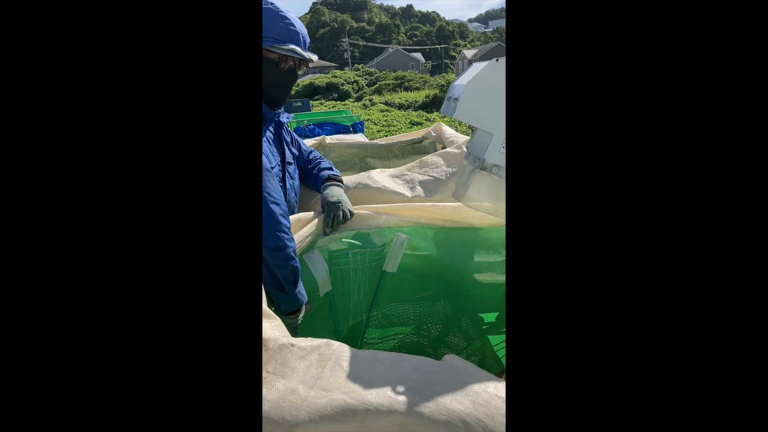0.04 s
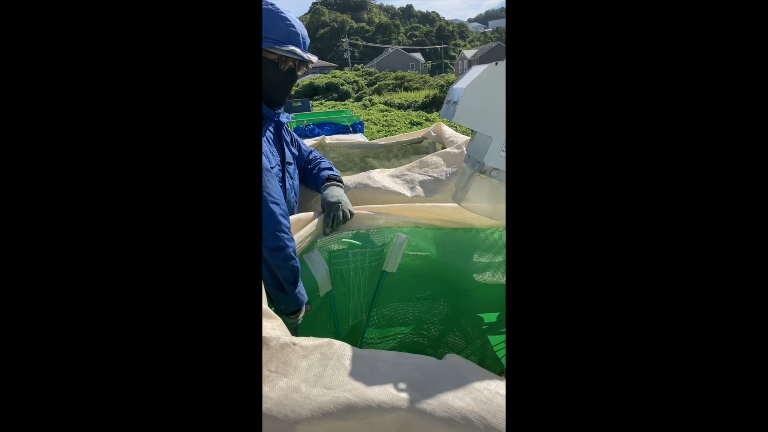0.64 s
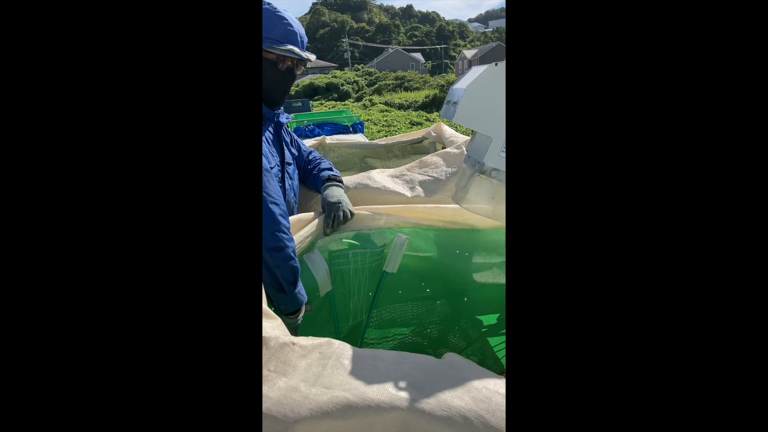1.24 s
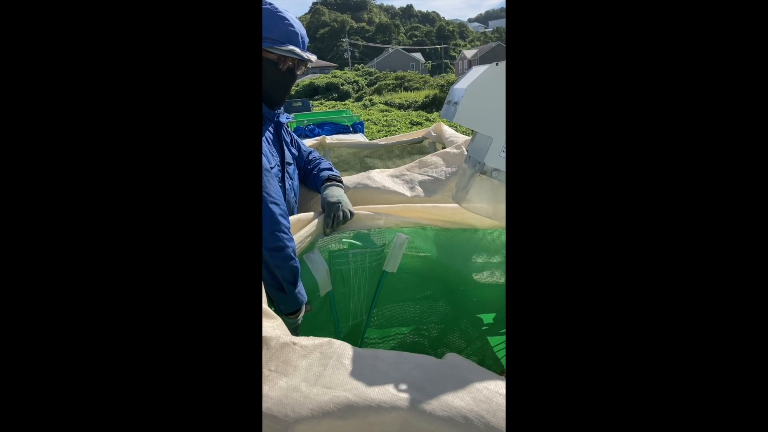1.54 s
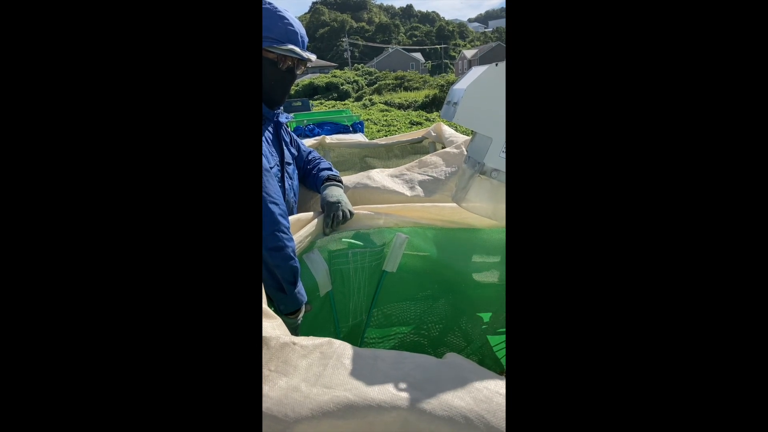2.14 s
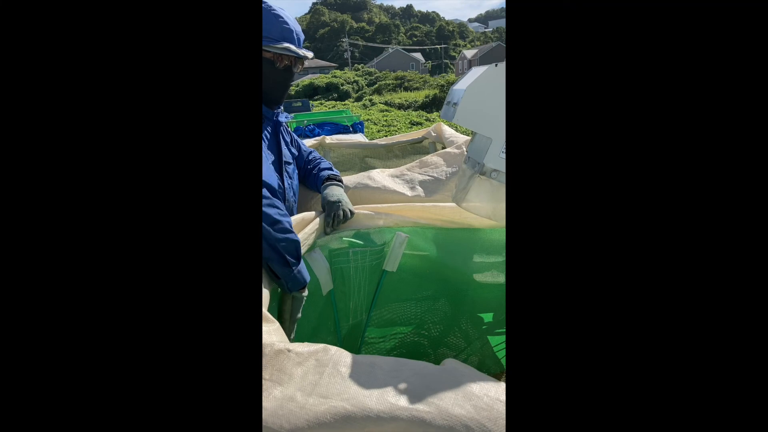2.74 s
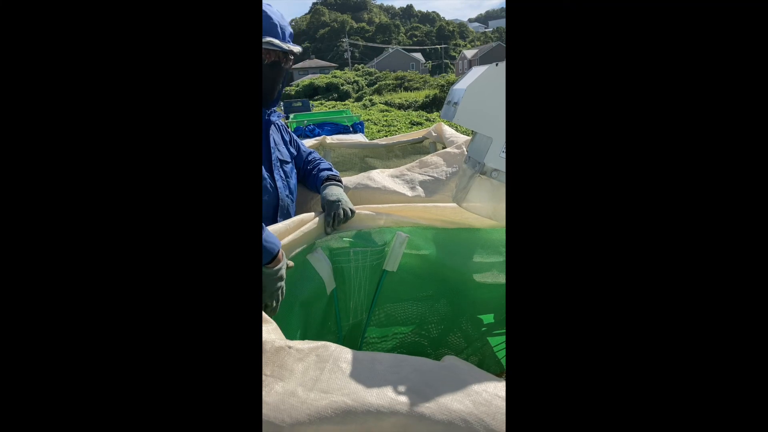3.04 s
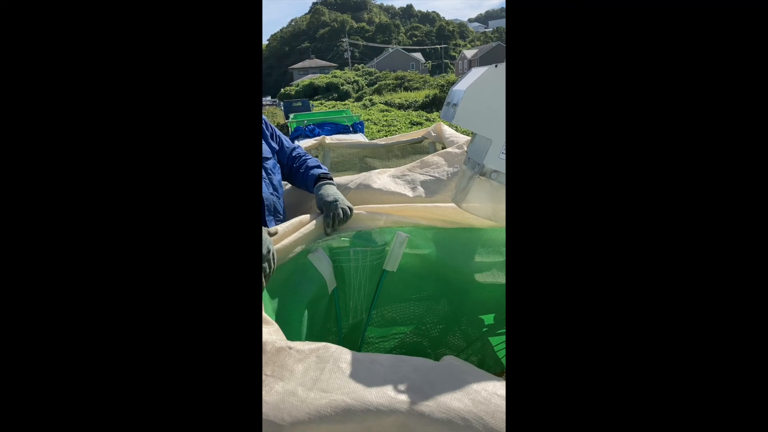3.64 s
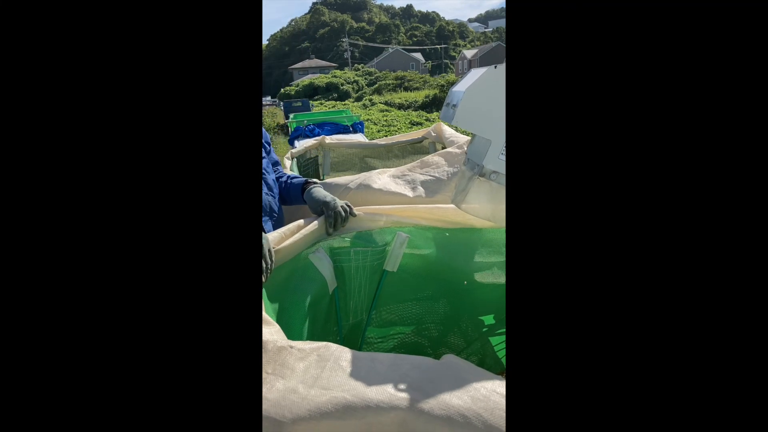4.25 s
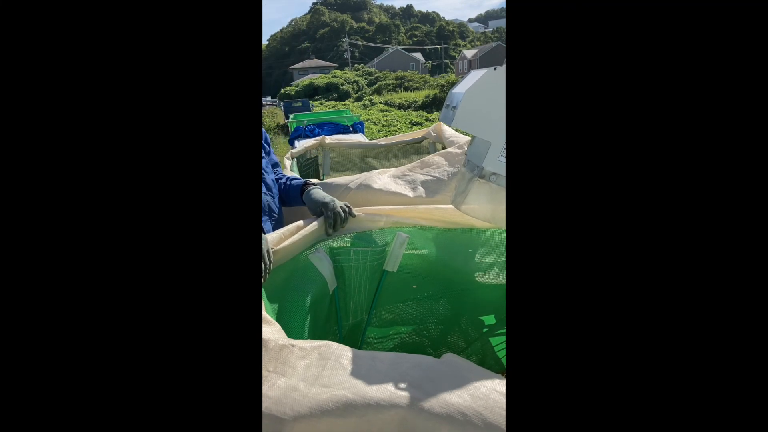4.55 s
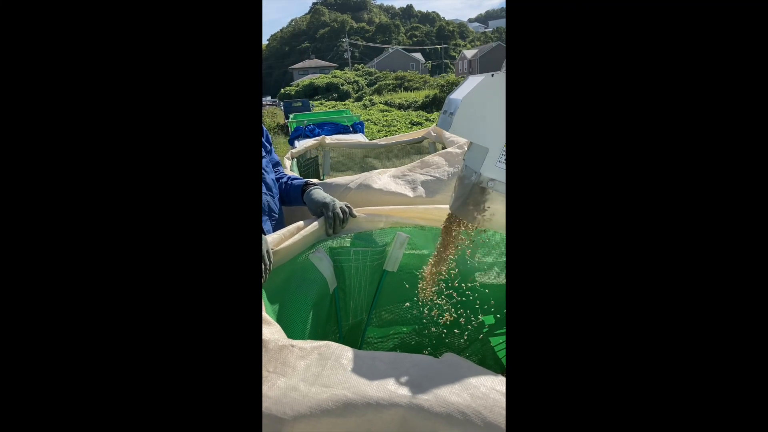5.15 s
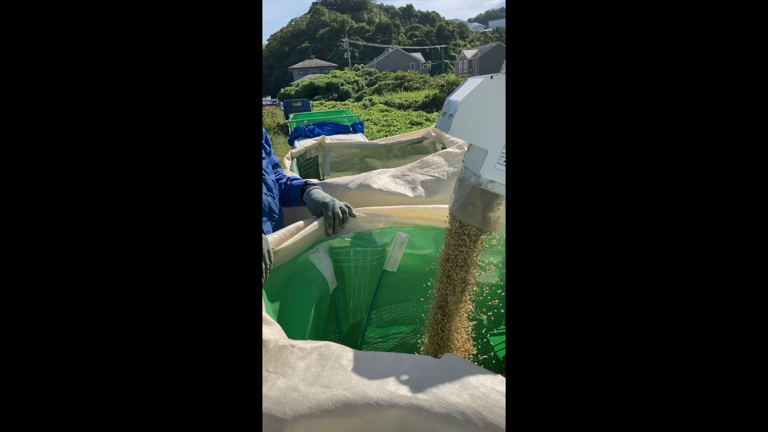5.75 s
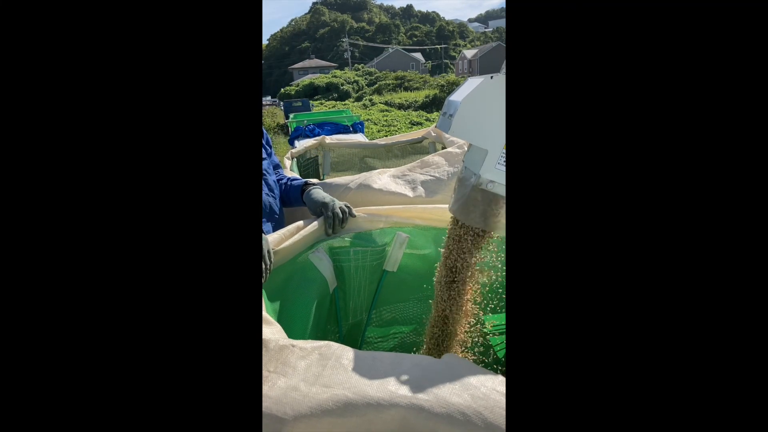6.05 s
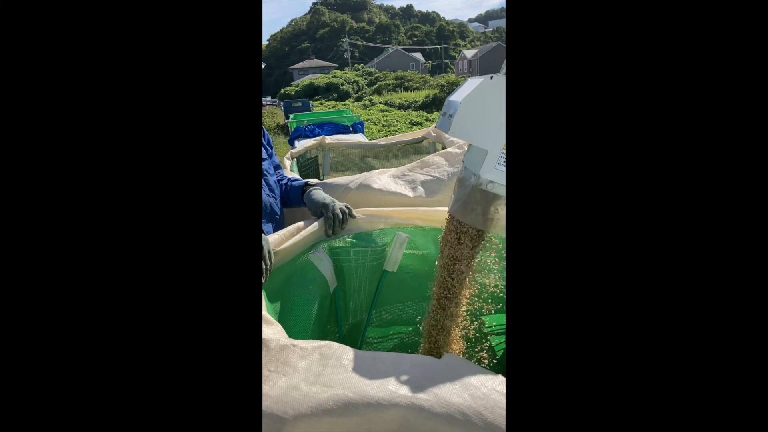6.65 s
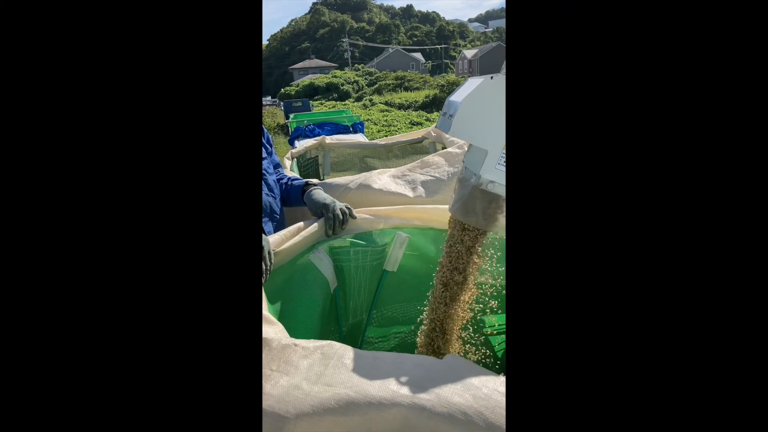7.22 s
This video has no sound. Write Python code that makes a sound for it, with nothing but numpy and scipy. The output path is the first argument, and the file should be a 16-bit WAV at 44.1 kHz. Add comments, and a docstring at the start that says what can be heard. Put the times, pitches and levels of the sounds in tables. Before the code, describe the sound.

A harvester's diesel idles, then a clutch clanks, the engine revs up and a rattling auger sends grain hissing into a bag.

```python
"""A combine harvester unloads into a grain bag, heard from a phone with two microphones beside the bag.
The diesel idles, a lever clicks, the clutch clanks in and the engine revs up. The auger rumbles and
rattles in its steel tube, once round in about four firings, and lifts the grain, whose hiss swells
until it pours from the spout. Close by, a hand and a sleeve brush the bag; insects trill in the field."""
import sys
import numpy as np
from scipy import signal
from scipy.fft import rfft, irfft, next_fast_len
from scipy.io import wavfile
from scipy.ndimage import map_coordinates

SR = 44100
rng = np.random.default_rng(int(sys.argv[2]) if len(sys.argv) > 2 else 0)


def put_to_file(sound):
    """Save the sound as 16-bit audio at rate SR, in the file named by the first command-line argument."""
    columns = np.atleast_2d(sound).T  # one column per channel
    safe = np.clip(columns, -1, 1)
    whole_steps = np.round(safe * 32767)
    wavfile.write(sys.argv[1], SR, whole_steps.astype(np.int16))


N = 325458
T = np.arange(N) / SR

# Levels in the tables are relative within each layer.
# bands of the two insects: f/Hz, level/dB
NEAR_INSECT = [(5800, -71), (6450, -1), (6680, 0), (6950, -10), (7600, -48)]
FAR_INSECT = [(8300, -28), (8900, -4), (9150, -1), (9400, -7), (10000, -40)]

# a hand creases the bag: t/s, level/dB, t60/s
BAG_CREASES = [(.112, -38.5, .025), (.1545, -32, .014), (.22, -39.5, .016), (.239, -46, .15),
               (.503, -44, .05), (.572, -42, .014), (.595, -39.5, .012), (.996, -44.5, .08),
               (1.138, -40, .04), (1.153, -40, .03), (1.167, -41, .04), (1.243, -38, .016),
               (2.906, -29, .05), (3.012, -28, .03), (3.026, -32, .03), (3.497, -30, .04)]
# colours of the creases and of a sleeve on the bag: f/Hz, level/dB
CREASE_COLOUR = [(4000, -1), (8000, -4.5), (15000, -7)]
SLEEVE_COLOUR = [(2400, -10), (3400, 2), (4800, 2), (7000, -4), (15000, -8)]

# colour of the lever's snap: f/Hz, level/dB
LINKAGE_COLOUR = [(200, -4), (400, 6), (700, 4.5), (1300, 5.5), (2000, 2), (3000, 1), (4500, 1),
                  (8500, -0.5), (11000, -4), (15500, -2.5)]
# the lever's ring and squeak: f/Hz, level/dB, t60/s
LEVER_MODES = [(950, 12, .07), (1300, 13, .08), (1530, -4, 0.72), (2090, 0.5, 0.55), (3000, -1, 0.3),
               (3700, -1, 0.3)]
SQUEAK_MODES = [(2690, -17.5, 0.15), (3170, -14.5, 0.098)]

# the diesel idles, revs up, overshoots, settles and sags under the grain: t/s, firing rate/Hz
ENGINE_SPEED = [(0, 39.6), (1.51, 39.4), (1.7, 52.4), (1.93, 65.6), (2.21, 59), (2.5, 65.8), (2.82, 71.5),
                (4.21, 71.2), (4.6, 69.05), (7.38, 69)]
# the governor opens fully, shuts on the overshoot, then holds the load: t/s, fuel/0-1
GOVERNOR = [(1.52, 0.78), (1.63, 1), (1.72, 1), (1.85, 1), (2.0, 0.16), (2.15, 0.17), (2.25, 0.45),
            (2.36, 0.71), (2.9, 0.67), (4.22, 0.67), (4.36, 0.72), (5.1, 0.67)]
# colours of the engine block and of the puffs of exhaust gas: f/Hz, level/dB
BLOCK_COLOUR = [(70, -7), (180, -14), (300, -9), (550, -15), (950, -17.5), (1600, -24), (2400, -25),
                (5000, -29.5), (10000, -36.5), (15500, -42)]
PUFF_COLOUR = [(50, 0), (110, -2), (200, -3), (300, -13.5)]
# the silencer's response for the second and third orders: f/Hz, level/dB
SILENCER_RESPONSE = [(79, -37.5), (95, -19), (106, -25.5), (117, -24.5), (131, -20.5), (138, -24),
                     (143, -27), (157, -26), (175, -30), (210, -30.5)]
# weak orders, thirds from three unequal cylinders: f/firing rate, idle level/dB, working level/dB
WEAK_ORDERS = [(2 / 3, -66, -55), (4 / 3, -70, -51), (5 / 3, -59, -51), (4, -53, -58), (5, -49, -48),
               (6, -53.5, -42)]

# metal clanks in the auger drive: t/s, level/dB, t60/s
DRIVE_CLANKS = [(1.3295, -11, 0.3), (1.44, -24, .3), (1.53, -22.5, .35), (1.715, -13.5, 0.25),
                (1.757, -12.5, 0.18), (1.778, -17.5, .17), (2.645, -22.5, .25), (2.675, -19, .2),
                (4.345, -15, 0.08)]
# dull knocks of the screw on its tube, hard clacks as the drive takes the load: t/s, level/dB
SCREW_KNOCKS = [(1.433, -22), (1.473, -21.5), (1.506, -24), (1.515, -13.5), (1.596, -17.5), (2.835, -22),
                (3.56, -23), (4.148, -20), (4.246, -19), (4.273, -20), (4.292, -17.5), (4.347, -20),
                (4.405, -20)]
LOAD_CLACKS = [(4.243, -21), (4.25, -24), (4.258, -22.5), (4.277, -26), (4.291, -20.5), (4.402, -22.5),
               (4.411, -24.5)]
# colours of a clank's clang, jolt to the housing, clash and thud: f/Hz, level/dB
PANEL_COLOUR = [(150, -2), (300, 2.5), (550, -5), (800, 7), (1000, -11), (1400, -2.5), (2000, -8),
                (3200, -7), (4200, -9), (5400, -6), (8000, -21), (11000, -30), (15500, -30)]
JOLT_COLOUR = [(500, 1.5), (800, 1), (1500, 1.5), (15000, 0)]
CLASH_COLOUR = [(2500, -3.5), (5400, 5), (8500, 1), (15000, -5.5)]
THUD_COLOUR = [(180, 3), (370, 2.5), (470, -2.5), (600, 1), (900, -14)]
# colours of the clacks and of the rattling chains and gears: f/Hz, level/dB
CLACK_COLOUR = [(700, -11), (1050, -11), (1270, 5), (1500, -3), (1720, -1), (2100, -12.5), (2400, -15),
                (2650, -6.5), (3200, -18), (4500, -11), (9000, -21)]
GEAR_COLOUR = [(180, -1), (250, 4.5), (400, 1.5), (540, 1), (650, -.5), (950, -7.5), (1400, -4.5),
               (2000, -10.5), (3000, -14.5), (4000, -15.5), (6500, -20), (9000, -20.5), (15500, -40)]
# the shaft rings on after the clutch bites: f/Hz, level/dB, t60/s
SHAFT_MODES = [(800, -17, .18), (1290, -31, .5), (1490, -29, .8), (1560, -33, .8), (2560, -29, .45),
               (2950, -30, .3)]
# sheet-metal housing of the drive: f/Hz, width/Hz, level/dB
HOUSING_MODES = [(241, 12, 10), (305, 18, 7.5), (366, 20, 5), (545, 20, 8), (630, 45, 5), (775, 35, 3),
                 (974, 45, -3), (1270, 90, 2), (1480, 35, -1), (1730, 80, -6), (2050, 60, -8),
                 (2555, 55, -8), (2950, 30, -10)]

# colours of the sliding grain and of the tube's rumble: f/Hz, level/dB
GRAIN_COLOUR = [(3000, -9), (4000, -4), (4700, 2), (5500, 5.5), (7000, 10.2), (8500, 11.7), (10500, 12.8),
                (12000, 12.3), (14000, 12), (15500, 7.5)]
TUBE_COLOUR = [(170, -17), (210, -4), (350, -1.5), (460, -8), (550, -8), (650, -11), (790, -15.5),
               (920, -8.5), (1300, -31), (1800, -19), (2500, -25), (3500, -27)]
# sprocket tones: f/turn rate, level/dB
SPROCKET_TONES = [(15, -20), (19, -18)]
# tube wall resonances: f/Hz, width/Hz, level/dB, lag/turns, tone's f/turn rate, tone's power share/0-1
WALL_MODES = [(545, 100, -8, .025, 32, .6), (650, 110, -12.5, -.07, 38, .25), (785, 90, -11.5, .23, 46, .4),
              (1295, 170, -14.5, .12, 76, .2)]

# how alike left and right sound at each frequency: f/Hz, likeness/0-1
STEREO_LIKENESS = [(100, .99), (450, .95), (900, .8), (1400, .5), (2300, .25), (3200, .7), (4000, .45),
                   (4700, .93), (5250, .997), (5700, .99), (6700, .72), (8600, .98), (10200, .7),
                   (11300, .99), (12300, .99), (13300, .65), (14500, .98)]
# left over right: f/Hz, level/dB
STEREO_BALANCE = [(60, -4.6), (150, -4), (300, -6), (600, -8), (1300, -7), (2200, -5.5), (3500, -1),
                  (5000, 0)]
# left ahead of right: f/Hz, phase/rad
STEREO_LEAD = [(100, 0), (300, -.4), (550, -1.1), (950, -1.6), (1400, 0), (2000, -.1), (2600, -3),
               (4000, -3.7), (4700, -3.35), (5300, -3.15), (5700, -3.1), (7000, -1.6), (8000, 0),
               (9600, .1), (11300, 3.1), (12500, 3.2), (14200, 6.2)]

CLUTCH_S, ENGAGE_S = 1.304, .031
TUBE_FULL_S, SETTLE_S, CHUG_DB = 4.2, .4, 2.6  # the screw chugs harder once its tube is full
TURNS_PER_FIRING = .2451


def amp(db):
    """Decibels to gain."""
    return 10 ** (np.asarray(db) / 20)


def unit(x):
    """Scale to rms 1."""
    return x / np.sqrt(np.mean(x ** 2) + 1e-20)


def along(points, hz):
    """Read (f/Hz, value) points on a log axis."""
    f, v = np.transpose(points)
    return np.interp(np.log(hz + 1), np.log(f + 1), v)


def curve(points):
    """Read (t/s, value) points at every sample."""
    return np.interp(T, *np.transpose(points))


def ramp(start_s, length_s):
    """A straight rise from 0 to 1."""
    return np.clip((T - start_s) / length_s, 0, 1)


def wobble(rate):
    """A smooth random curve, rate knots a second."""
    return map_coordinates(rng.standard_normal(int(N * rate / SR) + 4), [T * rate])


def throb(turns, depth_db):
    """A swell once per turn, rms 1."""
    return unit(amp(depth_db * np.cos(2 * np.pi * turns)))


def filtered(x, response):
    """Filter x by a function of frequency."""
    size = next_fast_len(N + 8192)
    return irfft(rfft(x, size) * response(np.fft.rfftfreq(size, 1 / SR)), size)[..., :N]


def resonance(f, hz, width):
    """Response of one mode."""
    return 1j * f * width / (hz * hz - f * f + 1j * f * width)


def body(x, colour):
    """Causal filter of unit power gain that falls steeply beyond the ends of its colour."""
    size = 4096
    hz = np.fft.rfftfreq(size, 1 / SR)
    low_cut = 1 + (.6 * colour[0][0] / (hz + 1)) ** 4
    high_cut = 1 + (hz / colour[-1][0] / 1.4) ** 4
    gain = amp(along(colour, hz)) / low_cut / high_cut
    cepstrum = irfft(np.log(unit(gain) + 1e-6))
    cepstrum[1:size // 2] *= 2  # fold to minimum phase
    cepstrum[size // 2 + 1:] = 0
    return signal.fftconvolve(x, irfft(np.exp(rfft(cepstrum)))[None], axes=1)[:, :N]


def spread(pair):
    """Two unrelated signals become left and right, more alike at some frequencies than at others."""
    def weights(hz):
        angle = np.arccos(np.clip(along(STEREO_LIKENESS, hz), -1, 1)) / 2
        return np.array([np.cos(angle), np.sin(angle)])
    mid, side = filtered(pair, weights)
    return np.array([mid + side, mid - side])


def noise():
    """White stereo noise."""
    return spread(rng.standard_normal((2, N)))


def impacts(rate, scatter_db):
    """Random tiny impacts of uneven size, rms 1."""
    hits = (rng.random((2, N)) < rate / SR) * rng.standard_normal((2, N))
    return unit(spread(hits * amp(scatter_db * rng.standard_normal((2, N)))))


def repeats(rows, gap_s, loss_db, count):
    """Each (t/s, level/dB) contact happens count times, ever weaker."""
    return [(s + k * gap_s, db - k * loss_db) for s, db in rows for k in range(count)]


def bursts(rows, t60, attack):
    """Envelope of (t/s, level/dB) blows that rise fast and die away; t60 is shared or given for each."""
    rows, t, power = list(rows), np.arange(SR) / SR, np.zeros(N + SR)
    for (s, db), life in zip(rows, np.broadcast_to(t60, len(rows))):
        power[int(s * SR):][:SR] += (amp(db - 60 * t / life) * (1 - np.exp(-t / attack))) ** 2
    return np.sqrt(power[:N])


def ring(start_s, modes, attack):
    """Modes struck at one moment; loose parts roughen their ring."""
    out = 0
    for hz, db, t60 in modes:
        phase = rng.uniform(0, 2 * np.pi) + .55 * wobble(130)
        out += bursts([(start_s, db)], t60, attack) * np.sin(2 * np.pi * hz * T + phase)
    return out


def insects(wing_hz=29.1):
    """Out in the field a near insect trills with its wing strokes; a farther one is faint and higher."""
    strokes = wing_hz * T + .5 + .04 * wobble(3.7)
    near = body(noise() * throb(strokes, depth_db=8), NEAR_INSECT)
    far = body(noise(), FAR_INSECT)
    return amp(-56 + .5 * wobble(4)) * near + amp(-69 + 2 * wobble(5)) * far


def bag():
    """Beside the microphones the woven bag crinkles under a hand, and a sleeve scrapes over it."""
    s, db, t60 = np.transpose(BAG_CREASES)
    creases = bursts(zip(s, db), t60, attack=.0002) * impacts(rate=14000, scatter_db=2)
    scrape = bursts([(3.908, -19)], t60=.16, attack=.015) * impacts(rate=5000, scatter_db=1.5)
    return body(creases, CREASE_COLOUR) + body(scrape, SLEEVE_COLOUR)


def housing(x):
    """The drive's sheet-metal housing resonates, at unit power gain."""
    def response(f):
        gain = sum((-1) ** k * amp(db) * resonance(f, hz, width)
                   for k, (hz, width, db) in enumerate(HOUSING_MODES))
        return gain / np.sqrt(np.mean(abs(gain) ** 2))
    return filtered(x, response)


def lever():
    """On the machine a lever squeaks, snaps into its notch, chatters and rings."""
    contact = [(1.0238, -19.5)]
    chatter = repeats(contact, gap_s=.016, loss_db=5.5, count=4)
    strike = bursts(chatter, t60=.1, attack=.0007) * noise()
    strike += bursts(contact, t60=.05, attack=.0004) * noise()
    snap = body(strike, LINKAGE_COLOUR) + amp(-12) * housing(strike)
    ringing = amp(-38 + 2.4 * wobble(41.1)) * ring(1.025, LEVER_MODES, attack=.00089)
    return snap + ringing + ring(.693, SQUEAK_MODES, attack=.012)


def engine_block():
    """The block gives a steady bed of noise."""
    return amp(-41.5) * body(noise(), BLOCK_COLOUR)


def exhaust(firings, balanced_fuel=.53, corner_hz=53.7):
    """Firing pulses leave the silencer as a boom, unsteady orders and puffs that grow with the fuel."""
    speed, fuel = curve(ENGINE_SPEED), curve(GOVERNOR)
    work = np.clip((speed - 40) / 30, 0, 1)
    fuel_db = -23 * (1 - fuel)
    crank = 2 * np.pi * firings
    # combustion pushes against the cylinders' pumping, so the boom dips as the fuel shuts and reopens
    boom = (fuel - balanced_fuel) * np.cos(crank) + .088 * np.sin(crank)
    boom_db = -12.5 - 1.16 * np.maximum(corner_hz - speed, 0)
    tones = amp(boom_db + .3 * wobble(18)) * boom
    for order, lag, loss_db in (2, 1 / 8, 0), (3, 1 / 4, 7):
        db = along(SILENCER_RESPONSE, order * speed) + fuel_db - loss_db
        tones += amp(db + .56 * wobble(23)) * np.cos(2 * np.pi * (order * firings - lag))
    for order, idle_db, work_db in WEAK_ORDERS:
        db = idle_db + work * (work_db - idle_db) + 3.2 * wobble(8.8)
        tones += amp(db) * np.cos(2 * np.pi * (order * firings + rng.random()))
    puffs = amp(-46.5 + fuel_db) * body(noise() * throb(firings, depth_db=4.5), PUFF_COLOUR)
    return np.sqrt(2) * tones + puffs


def clanks():
    """Clutch and screw jolt the housing: a ringing clang, a bright clash with a crack, and a thud."""
    s, db, t60 = np.transpose(DRIVE_CLANKS)
    blows = repeats(zip(s, db), gap_s=.02, loss_db=5, count=2)  # the slack strikes once more
    lives = np.repeat(t60, 2)
    knocks = bursts(SCREW_KNOCKS, t60=.06, attack=.00078)
    jolt = np.hypot(bursts(blows, lives, attack=.0011), amp(-5) * knocks)
    clang = body(amp(-7.5) * jolt * noise(), PANEL_COLOUR)
    ringing = housing(body(amp(-5) * jolt * noise(), JOLT_COLOUR))
    clash = amp(-11.5) * bursts(blows, lives, attack=.0063) * impacts(rate=2500, scatter_db=1)
    crack_db = -15.5 + 2.6 * (db - db.max())  # softer clanks barely crack
    crack = bursts(zip(s + .002, crack_db), t60=.05, attack=.0003) * noise()
    thud = np.hypot(amp(-15) * bursts(blows, t60=.16, attack=.0011), knocks) * noise()
    shaft = ring(s[0], SHAFT_MODES, attack=.002)
    return clang + ringing + shaft + body(clash + crack, CLASH_COLOUR) + body(thud, THUD_COLOUR)


def clacks():
    """Steel parts of the drive snap against each other under the first grain."""
    return body(bursts(LOAD_CLACKS, t60=.07, attack=.001) * noise(), CLACK_COLOUR)


def drive(firings):
    """Chains and gears rattle, louder with speed, until grain in the tube damps them."""
    rattle = amp(-3) * (noise() + impacts(rate=1200, scatter_db=1))
    rattle *= throb(firings, depth_db=1.5) * throb(firings / 4, depth_db=.6) * amp(.8 * wobble(40))
    speed = curve(ENGINE_SPEED)
    speed_db = .17 * (speed - speed[-1])
    damping_db = 4 * ramp(3.7, length_s=2.2)
    level = ramp(CLUTCH_S, ENGAGE_S) * amp(-28 + speed_db - damping_db)
    gears = amp(-1) * unit(body(rattle, GEAR_COLOUR))
    ringing = amp(-12) * unit(housing(rattle[::-1]))  # left and right swapped
    return level * (gears + ringing)


def grain(fill_s=3.55):
    """Thousands of kernels slide along the tube and patter into the bag; the hiss swells as it fills."""
    kernels = amp(-5) * noise() + amp(-2) * impacts(rate=6000, scatter_db=3)
    level_db = -25.8 - 26 * (1 - ramp(CLUTCH_S, fill_s)) + .53 * wobble(14)
    return ramp(CLUTCH_S, ENGAGE_S) * amp(level_db) * body(kernels, GRAIN_COLOUR)


def rubbing(turns, size=2600):
    """A rough surface passed again on every turn."""
    surface = rng.standard_normal((2, size))
    passes = [np.interp(turns * size % size, np.arange(size), row) for row in surface]
    return unit(spread(np.array(passes)))


def tube_wall(turns, angle, load):
    """Each resonance of the tube rasps and sings as the screw leans on its part of the wall."""
    out = 0
    for hz, width, db, lag, multiple, share in WALL_MODES:
        scrape = amp(-8) * rubbing(turns) + amp(-1) * impacts(rate=2500, scatter_db=1)
        rasp = unit(filtered(scrape, lambda f: abs(resonance(f, hz, width)) ** 2))
        song = np.sqrt(2) * np.sin(2 * np.pi * multiple * turns + .4 * wobble(6))
        lean = throb(angle - lag, depth_db=1.2 + CHUG_DB * load) * amp(1.2 * wobble(17))
        out += amp(db) * lean * (np.sqrt(1 - share) * rasp + np.sqrt(share) * song)
    return out


def chug(angle, load, lead_turns=.083):
    """Once a turn a flight of the screw bumps the tube, nearly the same knock every time."""
    strikes = np.diff(np.floor(angle + lead_turns), prepend=0).clip(0, 1) * amp(2 * wobble(17))
    knock = unit(filtered(strikes, lambda f: resonance(f, hz=575, width=65) ** 2))
    return amp(-10.6 - CHUG_DB * (1 - load)) * knock


def auger(firings):
    """The screw rubs the same spots of its tube on each turn, with fresh knocks and sprocket tones."""
    turns = firings * TURNS_PER_FIRING
    load = ramp(TUBE_FULL_S, SETTLE_S)
    angle = turns + .37 + .16 * (1 - load)  # arriving grain shifts the spot where the screw leans
    knocks = amp(-5) * rubbing(turns) + amp(-2) * impacts(rate=1500, scatter_db=1)
    rumble = amp(-7.5) * unit(body(knocks * throb(firings, depth_db=-3.5), TUBE_COLOUR))
    sprockets = 0
    for teeth, db in SPROCKET_TONES:
        level = amp(db + 1.5 * wobble(5))
        sprockets += level * np.sin(2 * np.pi * (teeth * turns + rng.random()) + .3 * wobble(6))
    fuel = curve(GOVERNOR)
    strain_db = 17 * (fuel - fuel[-1])  # louder with the engine's effort
    level_db = -28 - 21.5 * (1 - ramp(CLUTCH_S, length_s=1.4)) + strain_db
    return amp(level_db) * (tube_wall(turns, angle, load) + chug(angle, load) + rumble + sprockets)


def scene():
    """The harvester and the field, heard from the bag; everything that turns is geared to the diesel."""
    firings = np.cumsum(curve(ENGINE_SPEED)) / SR
    diesel = exhaust(firings) + engine_block()
    unloading = drive(firings) + auger(firings) + grain() + clanks() + clacks()
    return diesel + unloading + lever() + bag() + insects()


def record(dry, top_hz=15900):
    """The phone's microphone pair favours the right, shifts phase between sides and cuts the top."""
    sides = np.array([[.5], [-.5]])

    def microphones(hz):
        gain = amp(sides * along(STEREO_BALANCE, hz))
        gain /= np.sqrt(np.mean(gain ** 2, axis=0))
        return gain * np.exp(1j * sides * along(STEREO_LEAD, hz)) * (hz < top_hz)
    return filtered(dry, microphones)


dry = scene()
out = record(dry)
put_to_file(out)
```